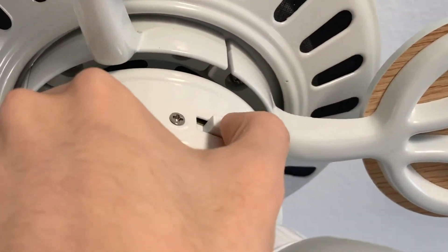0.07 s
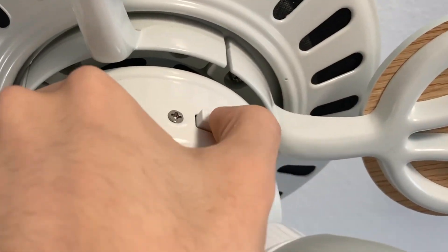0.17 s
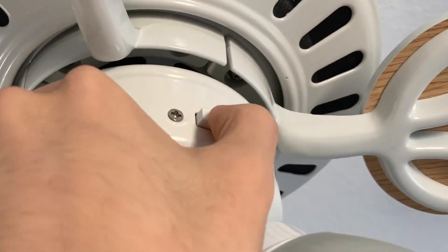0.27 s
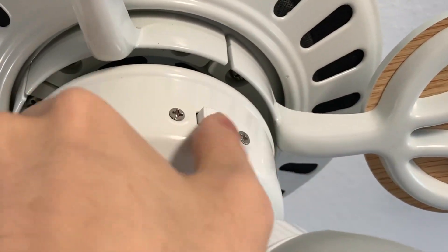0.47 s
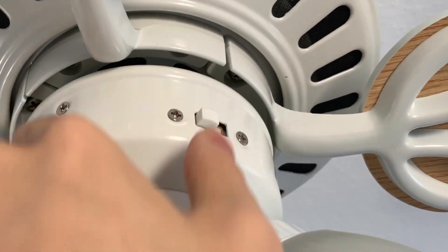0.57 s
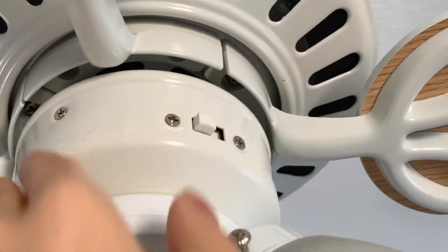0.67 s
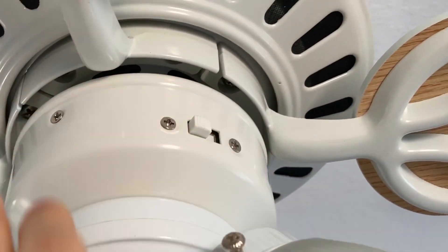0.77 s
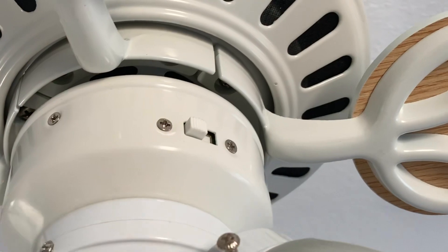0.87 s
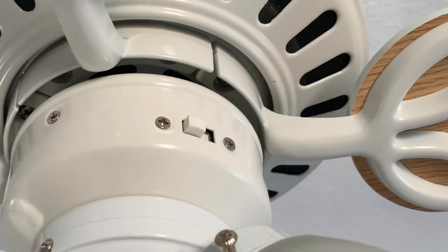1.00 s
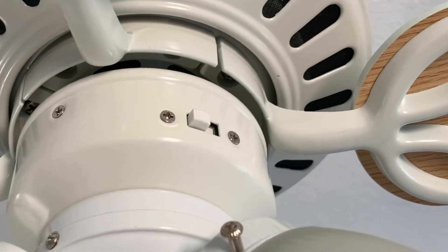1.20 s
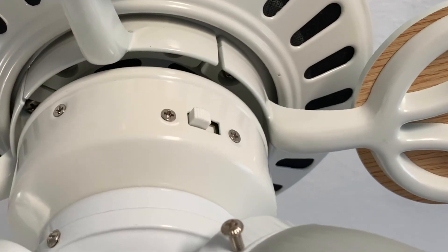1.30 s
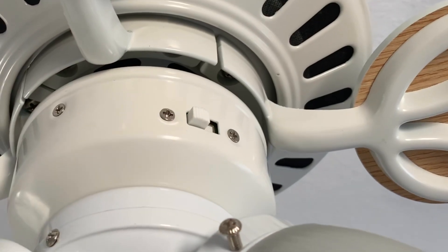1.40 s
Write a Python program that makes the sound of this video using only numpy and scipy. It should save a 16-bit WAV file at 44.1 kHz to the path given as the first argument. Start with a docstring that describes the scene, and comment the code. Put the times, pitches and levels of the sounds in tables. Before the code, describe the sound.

One bright, close click of a ceiling fan's slide switch, with a short echo.

```python
"""Over the low mains hum of a quiet room, a hand brushes a ceiling fan's housing, close by.
The thumb pushes a small slide switch: the slider scrapes in tiny slips and nudges the hollow housing.
At 0.24 s it snaps over with a bright crack. Switch and housing ring briefly, a spring sings on faintly,
the room echoes and the fan rocks with two dull thuds. A thin high hiss comes and goes
as the hand brushes away."""
import sys
import numpy as np
from scipy import signal
from scipy.fft import rfft, irfft
from scipy.io import wavfile

SR = 44100
rng = np.random.default_rng(int(sys.argv[2]) if len(sys.argv) > 2 else 0)


def file_out(sig):
    """Save sig as 16-bit WAV at sys.argv[1]."""
    # one column per channel
    cols = np.atleast_2d(sig).T
    # limit, then scale
    lim = np.clip(cols, -1, 1)
    pcm = np.round(lim * 32767).astype(np.int16)
    wavfile.write(sys.argv[1], SR, pcm)


N = 63945
SNAP_S = .2391

# The bright ping of the switch. Each row: pitch in Hz, level in dB, time to fall 60 dB in seconds.
SWITCH_MODES = [(2490, -29, .008), (3300, -26, .012), (3900, -27, .011), (4800, -28, .014),
                (6270, -27, .012), (8000, -12, .009), (8520, -13, .009), (10450, -11, .006),
                (10850, -7, .006), (12100, -18, .008), (12600, -12, .007), (14120, -17, .007),
                (14850, -17, .007)]
# The tone of the crack. Each row: frequency in Hz, relative level in dB.
CRACK_EQ = [(300, -35), (2500, -14), (6500, -13.5), (8200, -2.5), (11000, -3), (14500, -5.5),
            (16000, -17.5)]
# The tone of the chatter. Each row: frequency in Hz, relative level in dB.
CHATTER_EQ = [(400, -26.5), (1100, -4.5), (2000, -4.5), (3300, 0), (4500, 1.5), (6500, 0.5), (9000, -2.5),
              (13000, -1.5), (16000, -14.5)]
# The lingering spring and metal shell. Each row: pitch in Hz, level in dB, time to fall 60 dB in seconds.
SPRING_MODES = [(1300, -70, .8), (1467, -57, .4), (2230, -59, .45), (3047, -51, .45), (3671, -53, .5),
                (4200, -54, .45), (4320, -53, .33), (5001, -47, .25), (5025, -70, 1.5), (5034, -73, 1.5),
                (6266, -49, .2), (7905, -44, .14), (8010, -39, .18), (8547, -42, .15), (10520, -39, .15),
                (12580, -42, .12), (14870, -45, .15)]
# The hollow knock of the housing. Each row: pitch in Hz, level in dB, time to fall 60 dB in seconds.
HOUSING_MODES = [(63.3, -47.5, 0.2), (131, -46, 0.066), (242, -47, .05), (501.5, -34.5, .11),
                 (633, -26.5, 0.043), (776, -32, 0.035), (1111, -24.5, .02), (1432.6, -26, .016)]
# The thumb takes up the play. Each row: start in seconds, level in dB against the knock at the snap.
THUMB_NUDGES = [(0.1784, -26.5), (.1865, -21.5)]
# The slider's moves. Each row: start in seconds, length in seconds, opening and closing level in dB.
SCRAPE_STROKES = [(0.168, .009, -73.5, -72), (.1778, 0.017, -56, -60.5), (0.196, .021, -65.5, -71.5),
                  (0.221, .015, -60, -40.5), (0.235, .0055, -36.5, -22)]
# The tone of the scrape. Each row: frequency in Hz, relative level in dB.
SCRAPE_EQ = [(350, -13.5), (630, 4), (850, -7.5), (1050, -6.5), (1700, -3.5), (2400, -5.5), (3000, 3),
             (3500, -1), (5000, -3), (6800, -1), (7600, -11), (12300, -15), (16000, -19.5)]
# The fan rocks on its mount. Each row: start in seconds, level in dB.
THUD_HITS = [(0.266, -45.5), (0.315, -53)]
# The boom of one thud. Each row: pitch in Hz, relative level in dB, time to fall 60 dB in seconds.
MOUNT_MODES = [(62, 2.5, .12), (151, -9.5, .08), (310, -19.5, .06)]
# The hand grazes the housing. Each row: centre in seconds, width in seconds, level in dB.
BRUSH_STROKES = [(.12, 0.011, -77.5), (0.556, 0.013, -72), (0.807, 0.035, -75)]
# The tone of brushing skin. Each row: frequency in Hz, relative level in dB.
BRUSH_EQ = [(1000, -6), (2500, -9), (2900, 4), (3250, -2), (3750, 3), (4300, -1.5), (5100, -3.5),
            (6600, -6), (7200, -10), (16000, -10)]
# The swell and fade of the thin high hiss. Each row: time in seconds, level in dB.
SHEEN_FADER = [(.42, -110), (0.501, -81), (.55, -76.5), (.63, -82.5), (.84, -87.5), (.92, -110)]
# The tone of that hiss. Each row: frequency in Hz, relative level in dB.
SHEEN_EQ = [(8000, -26.5), (11500, -6.5), (11950, 3), (12400, -5.5), (12900, -2.5), (14500, -3.5),
            (15600, -1), (16000, -21)]
# The reverb tail. Each row: band centre in Hz, gain in dB, time to fall 60 dB in seconds.
REVERB_BANDS = [(100, -10.5, .4), (326.2, -13.5, 0.56), (550, -9.5, .34), (1260, -6, 0.51), (1990, -3, .45),
                (3200, -1.5, .46), (4200, 1, .45), (5484, 0.5, .4), (7160, -4.5, 0.39), (8400, 3, 0.43),
                (9200, -4, 0.41), (10660, -3.5, 0.34), (12255, -4.5, 0.31), (14800, -7.5, .17),
                (15740, -21.5, .13)]
# The early reflections. Each row: delay in seconds, gain in dB.
EARLY_ECHOES = [(.0096, -24.5), (.0215, -20)]
# The mains hum. Each row: pitch in Hz, rms level in dB ahead of the background fader.
HUM_PARTIALS = [(59.2, -69.5), (118.6, -80), (177, -82)]
# The tone of the room's rumble. Each row: frequency in Hz, relative level in dB.
RUMBLE_EQ = [(20, -10.5), (60, 0), (110, -2), (180, -9), (280, -18.5), (600, -24), (1500, -32), (5000, -46)]
# The tone of the room's hiss. Each row: frequency in Hz, relative level in dB.
HISS_EQ = [(200, 0), (1500, -3), (4000, -4.5), (7000, -6), (8200, -3), (12000, -3.5), (15500, -15.5)]
# The gentle rise and dip of the whole background. Each row: time in seconds, gain in dB.
BACKGROUND_FADER = [(0, -4), (.15, -1), (.3, -5), (.55, -4.5), (.7, -1), (1.45, -1.5)]


def undb(db):
    """Decibels to amplitude."""
    return 10 ** (np.asarray(db) / 20)


def clock():
    """Each sample's time in seconds."""
    return np.arange(N) / SR


def bins():
    """The filters' frequency axis in Hz."""
    return np.arange(N + 1) * SR / (2 * N)


def filtered(x, gain):
    """Apply a gain per frequency."""
    return irfft(rfft(x, 2 * N) * gain)[..., :N]


def log_curve(hz, values):
    """Join values by straight lines on a log-frequency axis."""
    return np.interp(np.log(bins() + 1), np.log(hz), values)


def colour(x, eq):
    """Shape the tone with an EQ curve, keeping the power of white noise."""
    gain = undb(log_curve(*np.array(eq).T))
    return filtered(x, gain / np.sqrt(np.mean(gain ** 2)))


def fader(points):
    """A gain that glides between (seconds, dB) points."""
    return undb(np.interp(clock(), *np.array(points).T))


def delayed(x, lag_s):
    """Delay a sound, even by a fraction of a sample."""
    return filtered(x, np.exp(-2j * np.pi * bins() * lag_s))


def near(x, left_lag_s=.00026):
    """A close source reaches the right channel first."""
    return np.array([delayed(x, left_lag_s), x])


def diffuse(draw=lambda: rng.standard_normal(N)):
    """A wide source: both channels share the bass and top treble, while the mids are unrelated."""
    bass = 1 / (1 + (bins() / 486) ** 2)
    treble = 1 - 1 / (1 + (bins() / 8100) ** 20)
    shared = np.clip(bass + treble, 0, 1)
    centre = near(filtered(draw(), np.sqrt(shared)))
    return centre + filtered(np.array([draw(), draw()]), np.sqrt(1 - shared))


def ring(modes, start_s, rise_s):
    """Damped modes that swell quickly after a blow, alternating in polarity."""
    age = np.maximum(clock() - start_s, 0)
    attack = 1 - np.exp(-(age / rise_s) ** 2)
    return attack * sum((-1) ** k * undb(db) * np.sin(2 * np.pi * hz * age) * undb(-60 * age / t60)
                        for k, (hz, db, t60) in enumerate(modes))


def burst(db, rise_s, decay_s):
    """A few milliseconds of hard, irregular contact at the snap."""
    age = np.maximum(clock() - SNAP_S, 0)
    envelope = (1 - np.exp(-age / rise_s)) * np.exp(-age / decay_s)
    return undb(db) * envelope * rng.choice([-1, 1], N)


def crack():
    """The slider hits its stop with a bright crack and chatters against it."""
    hit = near(burst(db=-9, rise_s=.0003, decay_s=.0012))
    chatter = diffuse(lambda: burst(db=-18.5, rise_s=.0001, decay_s=.0043))
    return colour(hit, CRACK_EQ) + colour(chatter, CHATTER_EQ)


def switch():
    """The snap strikes a short, bright ping from the switch."""
    return ring(SWITCH_MODES, SNAP_S, rise_s=.0004)


def spring():
    """The spring and metal shell sing on faintly after the snap."""
    return ring(SPRING_MODES, SNAP_S, rise_s=.006)


def housing():
    """The hollow housing knocks softly under the thumb, then hard just after the snap."""
    knocks = THUMB_NUDGES + [(SNAP_S + .0012, 0)]
    return sum(undb(db) * ring(HOUSING_MODES, start, rise_s=.0024) for start, db in knocks)


def scrape(slips_per_s=2300, spread_db=4):
    """Dense tiny slips of the slider in its slot make a gritty scrape."""
    t = clock()
    slips = (rng.random(N) < slips_per_s / SR) * rng.choice([-1, 1], N)
    slips = slips * undb(spread_db * rng.standard_normal(N))
    pressure = np.zeros(N)
    for start, length, first_db, last_db in SCRAPE_STROKES:
        sliding = (t >= start) & (t < start + length)
        pressure += sliding * fader([(start, first_db), (start + length, last_db)])
    return colour(pressure * slips / slips.std(), SCRAPE_EQ)


def thuds():
    """Low thuds as the fan settles on its mount after the push."""
    return sum(undb(db) * ring(MOUNT_MODES, start, rise_s=.005) for start, db in THUD_HITS)


def brush():
    """Soft swishes of skin on the housing."""
    touch = sum(undb(db) * np.exp(-((clock() - at) / width) ** 2 / 2) for at, width, db in BRUSH_STROKES)
    return touch * colour(diffuse(), BRUSH_EQ)


def sheen():
    """A faint high hiss swells and fades after the click."""
    return fader(SHEEN_FADER) * colour(diffuse(), SHEEN_EQ)


def room(send, predelay_s=.001, rise_s=.0034):
    """The walls return two early reflections and a diffuse tail whose top treble dies first."""
    age = np.maximum(clock() - predelay_s, 0)
    noise, centres, tail = diffuse(), np.array(REVERB_BANDS)[:, 0], 0
    for (_, db, t60), share in zip(REVERB_BANDS, np.eye(len(REVERB_BANDS))):
        band = filtered(noise, log_curve(centres, share))
        fade = (1 - np.exp(-age / rise_s)) * undb(-60 * age / t60)
        tail = tail + undb(db) * band * fade / np.linalg.norm(fade)
    early = sum(undb(db) * delayed(send, lag) for lag, db in EARLY_ECHOES)
    return signal.fftconvolve(send[None], tail)[:, :N] + near(early)


def background():
    """A bed of mains hum, low rumble and hiss, all riding one fader."""
    hum = sum(np.sqrt(2) * undb(db) * np.sin(2 * np.pi * (hz * clock() + rng.random()))
              for hz, db in HUM_PARTIALS)
    rumble = undb(-68.5) * colour(diffuse(), RUMBLE_EQ)
    hiss = undb(-81) * colour(diffuse(), HISS_EQ)
    return (hum + rumble + hiss) * fader(BACKGROUND_FADER)


def scene():
    """Mix the close switch and fan with their echo, the hand and the background, in stereo."""
    ping, knock, slide = switch(), housing(), diffuse(scrape)
    lean_left = undb([[1.25], [-1.25]])
    body = lean_left * near(knock, left_lag_s=.0001) + thuds()
    direct = slide + crack() + near(ping + spring()) + body
    # the walls answer the crack as one blow
    blow = undb(-.5) * (np.arange(N) == int(SNAP_S * SR))
    echo = room(slide[1] + blow + undb(-15) * ping + undb(.5) * knock)
    return direct + echo + brush() + sheen() + background()


def record(dry, ceiling=.88, top_hz=16200):
    """Round off the highest peaks and cut the very top."""
    rounded = dry / (1 + (dry / ceiling) ** 6) ** (1 / 6)
    lowpass = signal.ellip(8, .2, 70, top_hz, fs=SR, output="sos")
    return signal.sosfilt(lowpass, rounded)


dry = scene()
out = record(dry)
file_out(out)
```